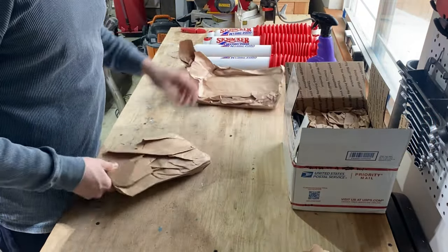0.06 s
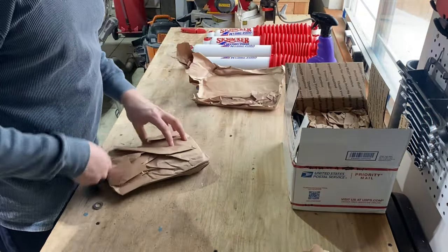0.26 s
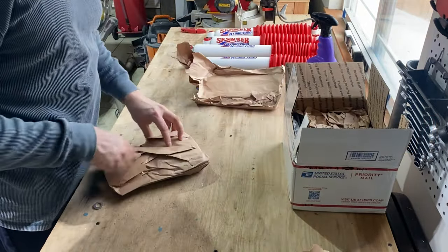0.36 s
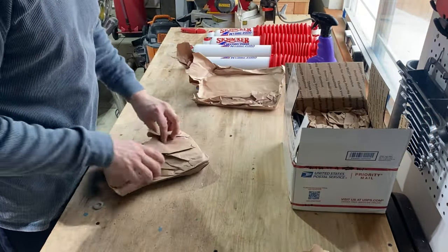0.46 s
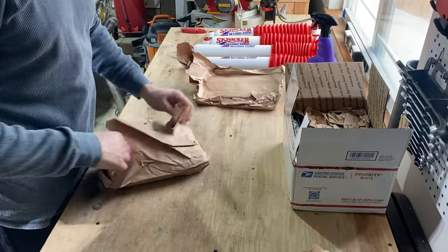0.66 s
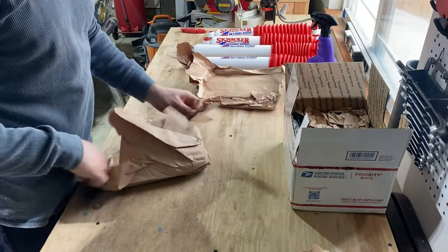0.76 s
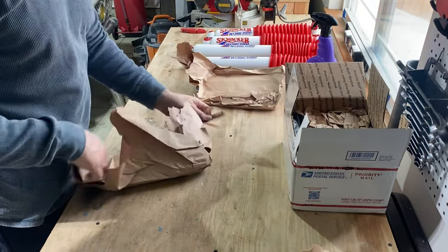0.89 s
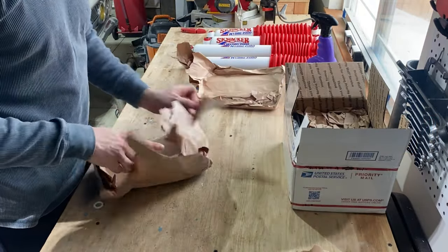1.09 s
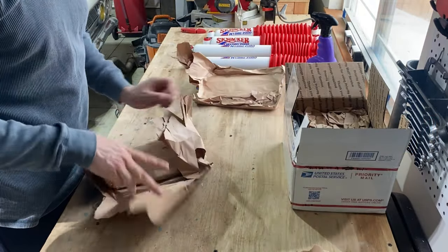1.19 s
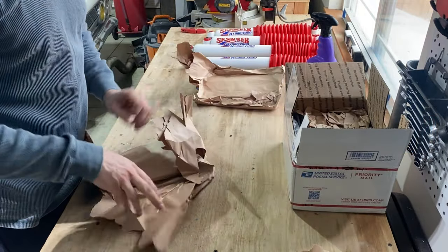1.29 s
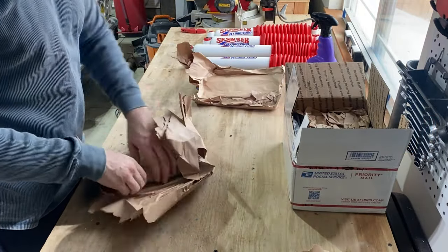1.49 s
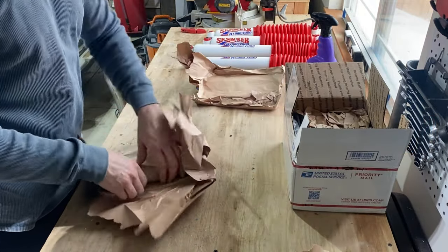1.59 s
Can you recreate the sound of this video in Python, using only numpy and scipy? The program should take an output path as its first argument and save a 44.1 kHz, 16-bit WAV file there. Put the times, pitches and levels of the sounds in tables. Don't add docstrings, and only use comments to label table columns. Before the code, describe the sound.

Stiff brown packing paper crackles and snaps as hands unwrap a parcel that thumps onto a bench

```python
import sys
import numpy as np
from scipy import signal
from scipy.fft import rfft, irfft, next_fast_len
from scipy.io import wavfile

SR = 44100
rng = np.random.default_rng(int(sys.argv[2]) if len(sys.argv) > 2 else 0)


def int16_out(signal):
    q = np.round(np.clip(np.atleast_2d(signal).T, -1, 1) * 32767)
    wavfile.write(sys.argv[1], SR, q.astype(np.int16))


def rack_gain(trim_db):
    fader = np.asarray(trim_db, float)
    return 10 ** (fader / 20)


N = 72765


def rms_one(x):
    return x / np.sqrt(np.mean(x ** 2) + 1e-20)


def at_hz(points, hz):
    points_hz, values = np.transpose(points)
    return np.interp(np.log(hz), np.log(points_hz), values)


def filtered(x, order, hz, kind):
    return signal.sosfilt(signal.butter(order, hz, kind, fs=SR, output="sos"), x)


def drift(rate_hz):
    r = np.exp(-80 * np.pi * rate_hz / SR)
    slow = signal.lfilter([1], [1, -2 * r, r * r], rng.standard_normal(N // 40 + 2002))[2000:]
    return np.interp(np.arange(N) / 40, np.arange(len(slow)), rms_one(slow))


def ring(clicks, hz, t60_s):
    r, w = rack_gain(-60 / (t60_s * SR)), 2 * np.pi * hz / SR
    return signal.lfilter([0, np.sin(w)], [1, -2 * r * np.cos(w), r * r], clicks + 1e-18)


def add(out, start_s, x):
    i = int(start_s * SR)
    out[i:i + len(x)] += x[:len(out) - i]


# time in seconds, crackle level in dB.
EFFORT = [(0, -43), (0.053, -33.5), (0.089, -39.5), (.32, -46), (.46, -43), (.5, -35.5), (.62, -34.5),
          (.65, -30), (.71, -33.5), (.8, -32.5), (.935, -37), (0.959, -32.5), (1.04, -39), (1.377, -44.5),
          (1.381, -38), (1.455, -36.5), (1.479, -41), (1.65, -46)]
# time in seconds, treble loss in dB per octave above PANEL_HZ.
PANEL_LOSS = [(0, 1.5), (.45, 0.6), (.6, 0.8), (.7, -.5), (.76, 2), (.82, 0.5), (.95, 1.5), (1.1, 0.7),
              (1.281, 2.5), (1.4, -0.8), (1.65, 1)]
# frequency in Hz, level in dB.
PAPER_SPECTRUM = [(250, -24), (500, 2.5), (1000, 2), (2000, -10), (4500, -6.5), (7000, -12.5),
                  (11000, -10.5), (16000, -34)]
PANEL_HZ, APART_DB, DULL_DB = 2200, -3, -2.5
GRAINS_PER_S, CLUMP_DB, GRAIN_SPREAD_DB, GRAIN_CYCLES = 3500, 4, 3.7, 4.5


def crackle():
    t = np.arange(N) / SR
    level_db = np.interp(t, *np.transpose(EFFORT))
    loss_db = np.interp(t, *np.transpose(PANEL_LOSS))
    sizes = rack_gain(GRAIN_SPREAD_DB * np.minimum(rng.exponential(1, N), 4)) * rng.choice([-1, 1], N)
    clump_db = CLUMP_DB * drift(25)
    bright, dull = np.zeros((2, N))
    for hz in np.geomspace(300, 15500, 24):
        grains_per_s = GRAINS_PER_S * np.sqrt(hz / 3000) / 8 * rack_gain(clump_db)
        born = rng.random(N) < grains_per_s / SR
        grains = rms_one(ring(np.roll(sizes, int(hz)) * born, hz, GRAIN_CYCLES / hz))
        octaves = np.clip(np.log2(hz / PANEL_HZ), -1, 2)
        band = dull if hz < 1300 else bright
        band += rack_gain(at_hz(PAPER_SPECTRUM, hz) - loss_db * octaves) * np.sqrt(hz) * grains
    sheet = 1.31 * rms_one(bright) + rack_gain(DULL_DB) * rms_one(dull)
    apart = filtered(np.roll(sheet, N // 3), 2, [2600, 6000], "band")
    return rack_gain(level_db) * sheet, rack_gain(level_db + APART_DB) * apart


SNAP_CLICKS_PER_S, SNAP_WIDTH_HZ, SNAP_RISE_S, SNAP_DB = 12000, 800, .001, -6.5
SNAP_LOW_SHARE = 0.49


def crease_burst(db, hz, treble_db, length_s, broad_db):
    t = np.arange(2048) / SR
    size, chance = rng.standard_normal((2, 2048))
    clicks = size * (np.abs(chance) < SNAP_CLICKS_PER_S / SR * 1.25)
    burst = clicks * rack_gain(-26 * t / max(length_s, .002))
    burst = burst * np.minimum(0.37 + t / SNAP_RISE_S, 1) + 1e-9
    burst[24] = np.abs(burst).max()
    patch = filtered(burst, 2, SNAP_LOW_SHARE * hz, "high")
    tone = ring(patch, hz, 2.2 / SNAP_WIDTH_HZ)
    broad = filtered(burst, 3, [1100, 7500], "band")
    top = filtered(burst, 3, 7500, "high")
    tone, broad, top = (part / np.abs(part).max() for part in (tone, broad, top))
    return rack_gain(db + SNAP_DB) * (tone + rack_gain(broad_db) * broad + rack_gain(treble_db + 15.5) * top)


# start in seconds, peak in dB, sheet resonance in Hz, treble in dB, length in seconds.
SNAPS = [(0.05, -13.5, 4750, -43, 0.016), (0.168, -18, 2090, -31, 0.013), (0.2776, -16, 1430, -22, 0.017),
         (0.3436, -15, 2200, -19, 0.014), (0.386, -9.5, 4250, -7, 0.0091),
         (0.394, -20.5, 2950, -4.5, 0.0093), (0.435, -18, 2370, -8, 0.0055),
         (0.5003, -28, 1970, -20, 0.011), (0.519, -20, 2260, -53, 0.051), (0.608, -12.5, 2120, -26, 0.027),
         (0.6352, -18.5, 1800, -5, 0.034), (0.732, -14, 2130, -14.5, 0.11), (0.824, -15.5, 3440, -5, 0.014),
         (0.883, -29, 2950, -24, 0.01), (0.8922, -14, 2130, -36, 0.028), (0.9506, -13, 3060, -14, 0.027),
         (1.0017, -16, 3330, -29, 0.016), (1.1033, -16.5, 2380, -15, 0.019),
         (1.1582, -8, 4500, -7.5, 0.0085), (1.3847, -6.5, 2290, -22, 0.004),
         (1.405, -14, 4370, -12.5, 0.011), (1.4345, -16.5, 2380, -10.5, 0.017),
         (1.486, -12, 4520, -16, 0.0066), (1.389, -19, 2170, -13, 0.039), (1.409, -21, 2100, -20, 0.022),
         (.645, -21, 2600, -7, 0.038), (0.748, -20, 1410, -25, 0.047), (0.785, -19, 1410, -23, .03),
         (1.577, -18, 2280, -18, 0.011)]


def snaps():
    out = np.zeros(N)
    for start_s, db, hz, treble_db, length_s in SNAPS:
        add(out, start_s, crease_burst(db, hz, treble_db, length_s, broad_db=-2.5))
    return out


# start in seconds, peak in dB, resonance in Hz, broad share in dB, length in seconds.
TICKS = [(0.2075, -20, 1440, 1.5, 0.027), (0.3514, -22.5, 4000, 3, 0.0056), (0.3805, -21, 4430, 0, .005),
         (0.412, -24, 2330, 5, 0.0056), (0.482, -20, 5700, -8, 0.0047), (0.4934, -19.5, 4400, 6, 0.0017),
         (0.513, -20, 3040, 2, .012), (0.537, -19, 3060, 5, 0.0015), (0.55, -12.5, 3420, -8, .003),
         (0.6623, -14, 2180, -1, 0.011), (0.677, -38, 1760, -10, 0.011), (0.759, -15, 1500, 3, 0.021),
         (0.7755, -13, 2310, -6, 0.02), (0.8066, -7.5, 1330, -16, 0.0057), (0.9007, -15.5, 1940, 0, 0.014),
         (0.962, -10, 1600, -10, 0.0085), (1.042, -35, 5000, -15, 0.0075),
         (1.069, -19.5, 1490, -28, 0.0052), (1.125, -17, 1590, 0, 0.036), (1.171, -26.5, 3780, 9, .005),
         (1.1902, -19, 1740, -21, 0.021), (1.2284, -22, 2620, -2, 0.022), (1.2535, -20, 1970, -16, 0.017),
         (1.269, -23, 3460, -4, 0.017), (1.282, -24, 2970, 0, 0.016), (1.3468, -21.5, 2600, -0.5, 0.019),
         (1.383, -10, 2150, -10, 0.0026), (1.398, -13.5, 4700, 3, 0.0044), (1.439, -12, 2160, -19, 0.0095),
         (1.452, -16, 1310, -28, .012), (1.5074, -23, 5360, 1, 0.0059), (1.584, -23, 2260, 3, 0.025)]


def ticks():
    out = np.zeros(N)
    for start_s, db, hz, broad_db, length_s in TICKS:
        add(out, start_s, crease_burst(db, hz, -26, length_s, broad_db))
    return out


# start in seconds, peak in dB, pitch in
# Hz, t60 in seconds.
FLAPS = [(0.038, -25.5, 730, 0.038), (0.15, -26.5, 123, 0.012), (0.162, -23, 101, 0.036),
         (0.609, -21, 640, 0.017), (0.638, -32, 520, 0.076), (0.728, -24, 690, 0.075),
         (0.806, -23.5, 501, 0.055), (0.826, -24.5, 1232, 0.11), (0.899, -27.5, 443, 0.03),
         (0.959, -22.5, 824, 0.058), (1.002, -24, 960, 0.015), (1.07, -24.5, 453, 0.14),
         (1.129, -19, 534, 0.026), (1.158, -19.5, 944, 0.011), (1.283, -30, 880, 0.017),
         (1.455, -24.5, 880, 0.031), (1.488, -31, 727, 0.047), (.527, -32.5, 157, 0.036),
         (.967, -35, 1230, 0.013), (.445, -25.5, 493, 0.16), (0.287, -11.5, 212, 0.18),
         (.336, -19, 211, 0.067), (.24, -12, 345, 0.054), (0.798, -33.5, 166, 0.053),
         (0.981, -35.5, 127, 0.033), (1.135, -29.5, 189, 0.052), (.145, -31.5, 700, .05),
         (1.575, -29.5, 560, 0.039)]
# start in seconds, peak in dB, pitch in Hz, t60 in seconds.
LOW_BUMPS = [
    (0.0, -31, 51.3, 0.23),
    (0.279, -30, 60, 0.18),
    (0.12, -24, 53.6, 0.54),
    (0.66, -34.5, 64.8, 1),
    (1.07, -31.5, 60, 0.39),
    (1.229, -27.5, 52.3, 0.086),
]


def flaps_and_bumps():
    out, t = np.zeros(N), np.arange(8192) / SR
    for start_s, db, hz, t60_s in [*FLAPS, *LOW_BUMPS]:
        push = rng.standard_normal(8192) * rack_gain(-60 * t / (0.033 + 6.1 / hz)) * np.minimum(t * hz, 1)
        t60_s = max(t60_s, .005)
        note = ring(push, hz, t60_s) + .5 * ring(push, 1.524 * hz, .5 * t60_s)
        add(out, start_s, rack_gain(db) * note / np.abs(note).max())
    return out


# start in seconds, level in dB, contact pitch in Hz.
DROPS = [(.2174, -9, 664), (0.2194, 3, 650), (0.2238, 6, 340), (.230, 0.5, 185), (0.242, -40, 296),
         (.252, -19, 240), (0.265, -13, 300), (0.282, -4.5, 408), (.292, -5.5, 252), (.299, -8.5, 232),
         (0.328, -12.5, 600), (0.344, -19, 277), (.372, -13, 338)]
# frequency in Hz, level in dB, t60 in seconds.
BENCH = [(60, -5, 0.15), (126, -7.5, 0.13), (185, -2.5, 0.19), (239, 5, 0.078), (345, 5, 0.094),
         (416, -12.5, 0.31), (544.5, 4, 0.13), (594, 4, 0.042), (690, 10, 0.053), (767, 1.5, 0.065),
         (984, 4, 0.073), (1091, 1.5, 0.097), (1312, -6, 0.14), (1490, -21, 0.098)]
DROP_DB, DROP_SCATTER_DB, CONTACT_DB_PER_OCTAVE, CONTACT_CYCLES, DETUNE = -1.5, 2, 8, 0.32, .02


def parcel():
    out, t = np.zeros(N), np.arange(SR // 2) / SR
    for start_s, db, contact_hz in DROPS:
        push = np.sin(np.pi * np.minimum(t * contact_hz / CONTACT_CYCLES, 1)) ** 2
        hit = np.zeros(len(t))
        for hz, mode_db, t60_s in BENCH:
            scatter, shift = rng.standard_normal(2)
            off_pitch_db = CONTACT_DB_PER_OCTAVE * abs(np.log2(hz / contact_hz))
            level = rack_gain(mode_db + DROP_SCATTER_DB * scatter - off_pitch_db)
            hit += level * ring(push, hz * (1 + DETUNE * shift), t60_s)
        hit = filtered(hit, 2, 90, "high")
        add(out, start_s, rack_gain(db + DROP_DB) * hit / np.abs(hit).max())
    return out


# start in seconds, level in dB, t60 in seconds.
SHUDDERS = [
    (0.2187, -19, 0.1),
    (0.284, -33.5, 0.52),
]


def shudder():
    t = np.arange(N) / SR
    noise = filtered(rng.standard_normal((2, N)), 3, [700, 1600], "band")
    level = np.zeros(N)
    for start_s, db, t60_s in SHUDDERS:
        level += rack_gain(db - 60 * np.maximum(t - start_s, 0) / t60_s) * (t > start_s)
    return rms_one(noise) * level


ROOM_T60_S, TREBLE_T60_S, WALL_CUT_HZ, ROOM_GAIN_DB = 0.61, .2, 5500, 11.5


def room(x):
    size, t = next_fast_len(N + SR), np.arange(SR // 2) / SR
    noise = rng.standard_normal((2, SR // 2)) * np.clip((t - .004) / .012, 0, 1)
    dull = filtered(noise, 1, WALL_CUT_HZ / 2, "low")
    tail = dull * rack_gain(-60 * t / ROOM_T60_S) + (noise - dull) * rack_gain(-60 * t / TREBLE_T60_S)
    tail *= rack_gain(ROOM_GAIN_DB) / np.sqrt(SR * ROOM_T60_S / (6 * np.log(10)))
    left, right = irfft(rfft(tail, size) * rfft(x, size), size)[:, :N]
    side = filtered((left - right) / 2, 3, 240, "high")
    return (left + right) / 2 + side * [[1], [-1]]


# frequency in Hz, level in dB.
RUMBLE_SPECTRUM = [(25, -38), (55, 19.5), (130, -23), (320, -28), (2000, -24.5), (8000, -24.5),
                   (16000, -24)]
RUMBLE_DB, RUMBLE_LUMP_DB = -45, 1.5


def rumble():
    out, edges_hz = np.zeros((2, N)), 25 * 2 ** np.arange(0, 9.6, .5)
    white = rng.standard_normal((2, 2, N + 8192))
    for k, (low_hz, high_hz) in enumerate(zip(edges_hz, edges_hz[1:])):
        mid, side = filtered(white[k % 2], 2, [low_hz, high_hz], "band")[:, 8192:]
        hz = np.sqrt(low_hz * high_hz)
        level = rack_gain(at_hz(RUMBLE_SPECTRUM, hz) + RUMBLE_LUMP_DB * drift(1.6))
        out += level * (mid + min(hz / 700, .8) * side * [[1], [-1]])
    return rack_gain(RUMBLE_DB) * rms_one(out)


# frequency in Hz, phase in half turns.
TREBLE_PHASE = [(0, 0), (2500, -.1), (6100, -.33), (6800, 0), (7300, 0), (8350, 1), (9250, 1), (10600, 2),
                (11800, 2), (12850, 3), (14200, 3), (15300, 4)]
SHARED_FROM_HZ, SHARED_FULL_HZ = 6000, 7300


def shared_treble(x, extra_half_turns):
    size = next_fast_len(N + 4096)
    hz, spectrum = np.arange(size // 2 + 1) * SR / size, rfft(x, size)
    shared = np.clip((hz - SHARED_FROM_HZ) / (SHARED_FULL_HZ - SHARED_FROM_HZ), 0, 1)
    phase = np.interp(hz, *np.transpose(TREBLE_PHASE))
    phase -= extra_half_turns * np.minimum(hz / SHARED_FROM_HZ, 1)
    turn = np.exp(.5j * np.pi * phase * [[1], [-1]])
    return irfft(((1 - shared) * spectrum + shared * spectrum[0]) * turn, size)[:, :N]


def scene():
    creases = snaps()
    sheet, apart = crackle()
    paper = sheet + ticks() + flaps_and_bumps()
    drop = parcel()
    echo = room(rack_gain(-14) * (paper + creases) + rack_gain(-14.5) * drop)
    near = paper * rack_gain([[.2], [-.2]]) + drop * rack_gain([[.4], [-.4]]) + apart * [[1], [-1]]
    near = near + echo + rumble() + shudder()
    return shared_treble(near, 0) + shared_treble(np.array([creases, creases]), 0.25)


def band_limit(x):
    return signal.sosfilt(signal.butter(12, 16970, fs=SR, output="sos"), x)


def record(dry):
    cut = signal.sosfilt(signal.cheby2(24, 60, 16200, fs=SR, output="sos"), dry)
    cut = filtered(cut, 3, 42.7, "high")
    return band_limit(np.clip(cut, -1, 1))


dry = scene()
out = record(dry)
int16_out(out)
```